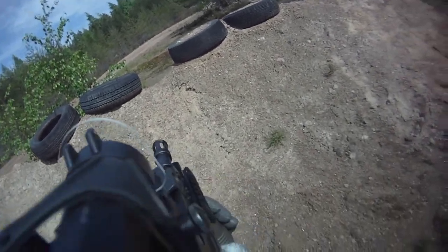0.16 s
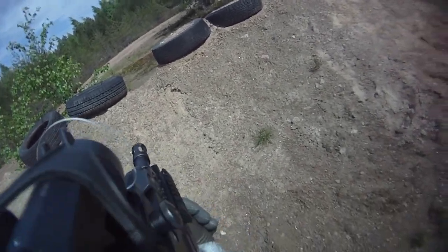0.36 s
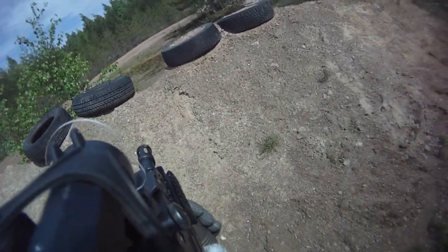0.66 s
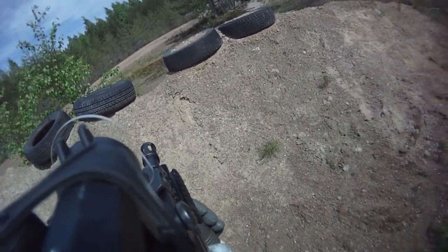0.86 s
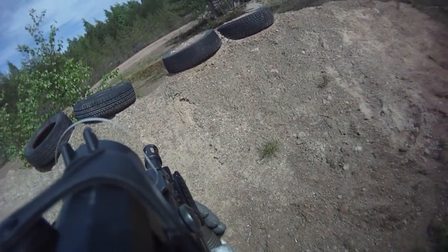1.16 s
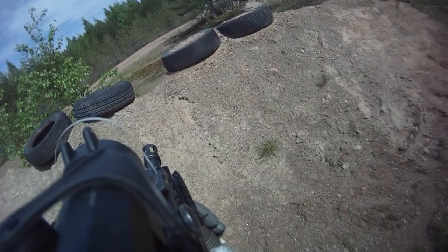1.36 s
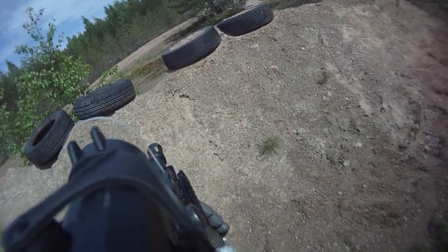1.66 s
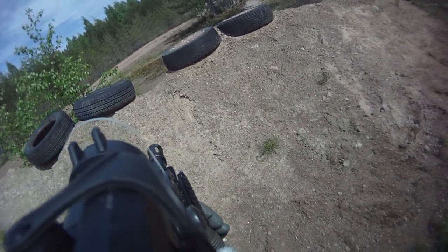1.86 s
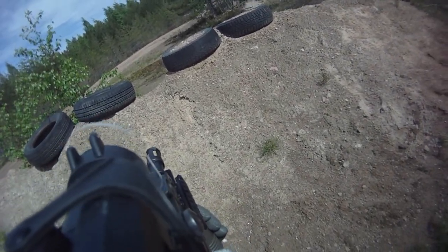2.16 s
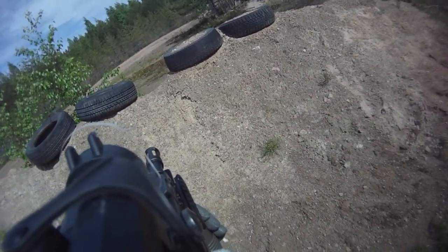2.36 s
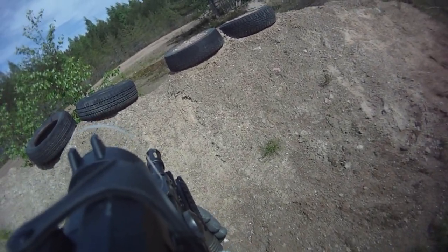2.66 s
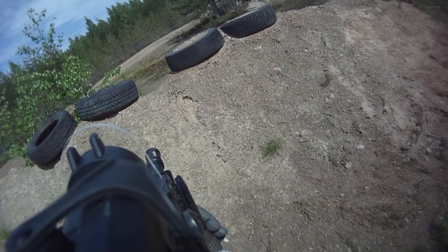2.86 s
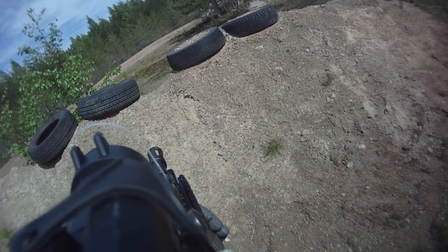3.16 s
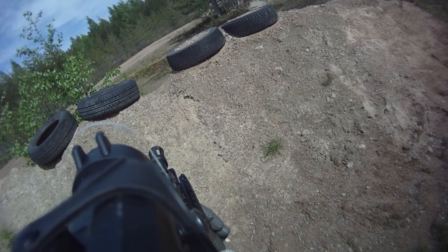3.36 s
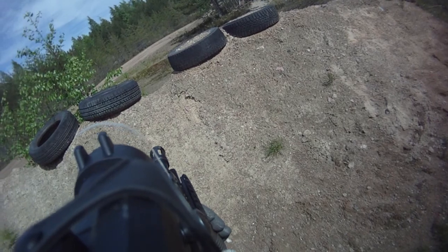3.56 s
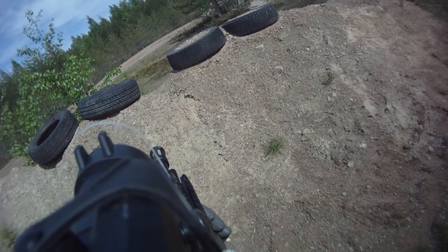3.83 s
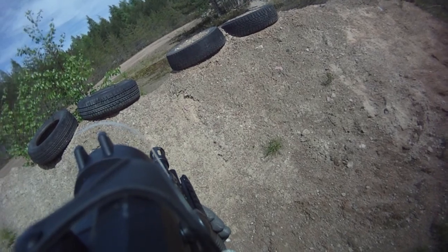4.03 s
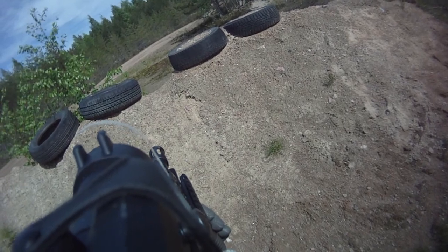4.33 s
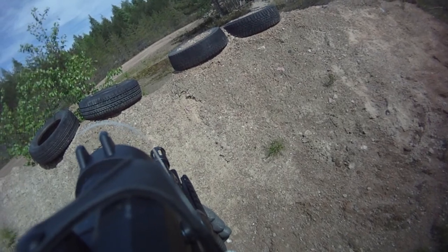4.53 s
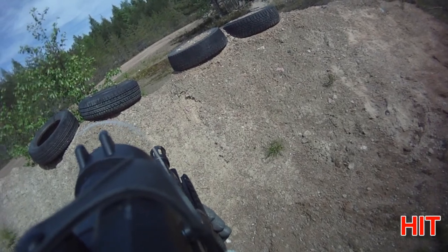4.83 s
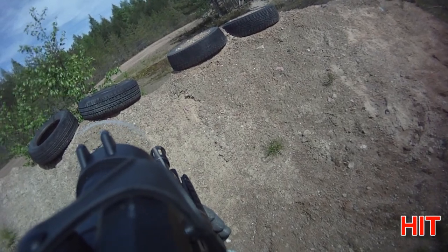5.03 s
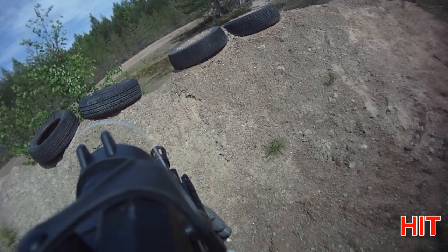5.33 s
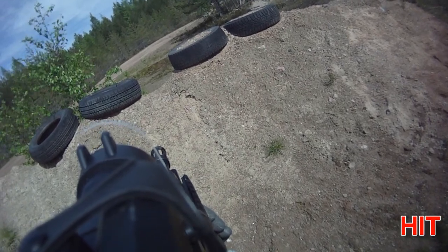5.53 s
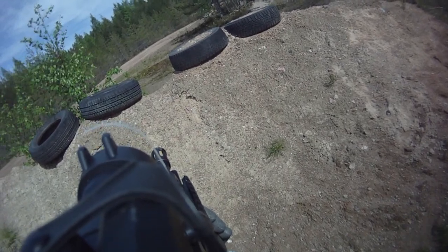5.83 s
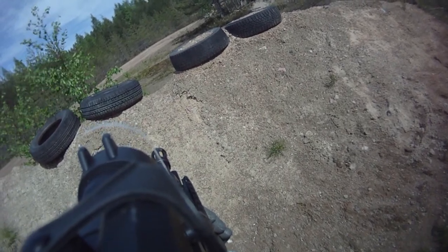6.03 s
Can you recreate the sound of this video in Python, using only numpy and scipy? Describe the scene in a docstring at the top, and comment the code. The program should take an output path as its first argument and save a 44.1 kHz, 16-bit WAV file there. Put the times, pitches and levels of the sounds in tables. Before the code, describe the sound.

Close, dry mechanical clatter of a battery-powered toy rifle: two eleven-shot bursts, then six shots, with quiet rustling wind in trees between.

```python
"""Three automatic bursts of an electric airsoft rifle, close by, out of doors, over a rush of wind in the trees.
Each shot: piston slam (struck shell modes), muzzle pop (swelling barrel modes), nozzle snap (modes and noise).
Around the shots: gears (harmonics of a tooth rate, coloured noise, ticks), trigger clicks and latch clacks.
A small camera's gain control ducks rifle and wind together; loud peaks clip."""
import sys
import numpy as np
from scipy import signal
from scipy.fft import rfft, irfft
from scipy.io import wavfile

SR = 44100
rng = np.random.default_rng(int(sys.argv[2]) if len(sys.argv) > 2 else 0)


def master(y):
    """Save y as 16-bit WAV."""
    cut = np.clip(np.atleast_2d(y).T, -1, 1)
    pcm = np.round(cut * 32767)  # scale
    wavfile.write(sys.argv[1], SR, pcm.astype(np.int16))


N = 272979
TIME = np.arange(N) / SR
AGE = np.arange(4096) / SR  # time since the start of one short sound

# motor start to last shot: (motor start [s], first shot [s], shots [count], cycle at speed [s],
# first wind-up tooth rate [Hz], first wind-up whine level [dB], first wind-up noise offset [dB])
BURSTS = [(1.151, 1.248, 11, .0929, 1310, -9, 2), (2.572, 2.6611, 11, .0934, 1190, -12, -1),
          (4.366, 4.4561, 6, .0934, 1220, -10, 0)]
# stock thud as the spring is let go: (frequency [Hz], relative level [dB])
STOCK_MODES = [(120, -26), (268, -32)]
# hollow receiver as the piston drives home: (frequency [Hz], relative level [dB])
BOOM_MODES = [(296, -0.5), (375, -2)]
# lesser piston blows: (mean time after slam [s], level re slam force [dB], rattle t60 [s])
BLOWS = [(-.0106, -25, .02), (-.003, -23, .02), (-.0014, -19, .012), (.0016, -18, .01), (.0042, -13, .009),
         (.0054, -17, .01), (.0076, -18, .01), (.0148, -28, .02)]
# air in barrel and muzzle, before pitch scaling: (frequency [Hz], relative level [dB])
BARREL_MODES = [(470, -10.5), (560, -1.5), (740, -16.5)]
# nozzle knock, before pitch scaling: (frequency [Hz], relative level [dB])
NOZZLE_MODES = [(430, -39.5), (620, -15), (750, -12.5)]


def firing(burst, slam_db=15, chatter_db=-4, pop_db=6.5, boom_db=-5.0, stock_db=4,
           release_db=2, nozzle_db=4, snap_db=-13, hiss_db=-24):
    """Release, slam, muzzle pop and nozzle return, once for each turn of the sector gear."""
    release_s, pop_s, return_s, lag_s, jitter_s = .0106, .0037, .0225, .0075, .00005
    contact_s, push_s, boom_s, stock_s, pitch_spread = .00005, .0025, .0062, .009, .015
    # slam and pop start weaker and settle; chance varies each shot
    first_slam_db, first_pop_db, settle_shots, shot_spread_db = -3, -3.5, 1.5, 1.77
    pop_swell_s, pop_start_ratio, pop_rise_per_s = .0029, .783, 78
    out = np.zeros(N)
    for k, slam_s in enumerate(shots_of(burst)):
        settling = np.exp(-k / settle_shots)
        force_db = settling * first_slam_db + shot_spread_db * rng.standard_normal()
        air_db = settling * first_pop_db + shot_spread_db * rng.standard_normal()
        force = gain_of(slam_db + force_db)
        pitch = 1 + pitch_spread * rng.standard_normal()

        stock = gain_of(stock_db) * ring(STOCK_MODES, stock_s)
        release = gain_of(release_db) * ring(NOZZLE_MODES, push_s, pitch=.59)
        add(out, slam_s - release_s, stock + release)

        add(out, slam_s, force * strike(contact_s) + gain_of(chatter_db) * rattle(.0053))
        add(out, slam_s - .003, gain_of(boom_db + air_db) * ring(BOOM_MODES, boom_s))
        for delay_s, db, t60 in BLOWS:
            blow_s = slam_s + delay_s + jitter_s * rng.standard_normal()
            add(out, blow_s, force * gain_of(db) * clack(t60))

        pop = ring(BARREL_MODES, pop_swell_s, pop_start_ratio * pitch, pop_rise_per_s)
        hiss = force * gain_of(hiss_db) * puff(push_s)
        add(out, slam_s + pop_s, gain_of(pop_db + air_db) * pop + hiss)

        # later return while the motor gathers speed
        back_s = slam_s + return_s + lag_s * np.exp(-k)
        nozzle = gain_of(nozzle_db) * ring(NOZZLE_MODES, push_s, pitch)
        add(out, back_s, nozzle + gain_of(snap_db) * puff(push_s))
    return out


LAG_S, LAG_SHARE = .0118, .12  # total time lost; each cycle's loss as a share of the one before


def shots_of(burst):
    """Shot times [s]: the motor gathers speed over the first cycles, then the beat is even."""
    first_s, shots, cycle_s = burst[1:4]
    k = np.arange(shots)
    return first_s + k * cycle_s + LAG_S * (1 - LAG_SHARE ** k)


# gearbox and receiver modes: (frequency [Hz], mean relative level [dB], t60 [s])
SHELL_MODES = [(744, -28.5, 0.033), (1276, -27.5, 0.033), (1940, -7.5, 0.008), (2357, -10, 0.006),
               (2720, -18, 0.01), (3590, -16.5, 0.0086), (5000, -22.5, .005), (5200, -25.5, 0.011),
               (6370, -15.5, 0.0054), (7020, -8, 0.0059), (11800, -22.5, 0.0024)]


def strike(contact_s, scatter_db=1.9):
    """A blow on the gearbox: the shorter the contact, the brighter the ring."""
    modes = np.zeros(len(AGE))
    for hz, db, t60 in SHELL_MODES:
        level = gain_of(db + scatter_db * rng.standard_normal())
        modes += level * dying(t60) * np.cos(2 * np.pi * hz * AGE)
    contact = swelling(contact_s)
    return signal.oaconvolve(modes, contact / contact.sum())[:len(AGE)]


# colour of loose parts, puffs and scatter: (frequency [Hz], relative level [dB])
RATTLE_SPECTRUM = [(60, -29), (250, -22.5), (500, 11.5), (750, -4.5), (1000, 5.5), (2100, 11), (3600, 13.5),
                   (5500, 2.5), (7200, -9.5), (9000, -38.5), (12500, -23.5), (15500, -18.5)]


def rattle(t60):
    """Loose parts chatter after a blow: coloured noise, decaying."""
    return coloured(rng.standard_normal(len(AGE)), RATTLE_SPECTRUM) * dying(t60)


def clack(t60, rattle_db=-2):
    """A lesser, duller blow: shell ring plus chatter."""
    return strike(.00008) + gain_of(rattle_db) * rattle(t60)


def puff(swell_s):
    """A short rush of noise through the gun's body."""
    return coloured(rng.standard_normal(len(AGE)), RATTLE_SPECTRUM) * swelling(swell_s)


def ring(modes, swell_s, pitch=1, rise_per_s=0):
    """Well damped modes driven by a soft push; their pitch may climb as they sound."""
    turn = 2 * np.pi * pitch * (AGE + rise_per_s * AGE ** 2 / 2)
    tones = sum(gain_of(db) * np.sin(hz * turn) for hz, db in modes)
    return swelling(swell_s) * tones


RUN_DOWN_S = .1  # gears run on after the last slam


def gears(burst, rise_s=.013, coast_s=.063, wind_up_db=-1):
    """Steel teeth grind, tick and whine as the motor turns them."""
    whine_db, unloaded_db, coasting_db, waver, release_s = -16.5, -1, 1.5, .005, .011
    start_s, first_s, _, _, first_hz, first_db, noise_db = burst
    stop_s = shots_of(burst)[-1] + RUN_DOWN_S
    tooth_hz = mesh_pitch(burst) * (1 + waver * wander(150))
    turn = 2 * np.pi * np.cumsum(tooth_hz) / SR
    fade_in = np.clip((TIME - start_s) / rise_s, 0, 1)
    fade_out = np.clip((stop_s - TIME) / coast_s, 0, 1)
    winding_up = np.interp(TIME, [first_s - release_s, first_s], [1, 0])
    speed = np.minimum(tooth_hz / first_hz, 1)
    grind = grinding() * gain_of((wind_up_db + noise_db) * winding_up) * speed ** .5
    # fast, lightly loaded gears sing least; the slow first stroke has most torque and sings loudest
    unloaded = np.clip((tooth_hz - 2000) / 500, 0, 1)
    first_torque = winding_up * gain_of(first_db) * speed ** 2
    later_torque = (1 - winding_up) * gain_of(whine_db + unloaded_db * unloaded)
    # slack gears ring out as they slow
    coasting = np.interp(TIME, [stop_s - RUN_DOWN_S, stop_s - coast_s], [0, 1])
    sung = (first_torque + later_torque) * gain_of(coasting_db * coasting) * whine(tooth_hz, turn)
    return fade_in * fade_out * (grind + sung + ratchet(turn))


def mesh_pitch(burst):
    """Pinion tooth rate [Hz]: spins up, sags ever faster as each stroke loads the spring, coasts down."""
    free_hz, loaded_hz = 2540, 1930  # scaled down over the first cycles
    spin_up_s, recover_s, release_s, coast_s = .075, .03, .011, .026
    start_s, first_hz, times = burst[0], burst[4], shots_of(burst)
    u = np.linspace(0, 1, 8)
    points = [*zip(start_s + u * spin_up_s, first_hz * (1 - (1 - u) ** 2))]
    points += [(times[0] - release_s, first_hz)]
    for k, (slam_s, next_s) in enumerate(zip(times, times[1:])):
        stroke_s = np.linspace(slam_s + recover_s, next_s - release_s, len(u))
        sag_hz = free_hz + (loaded_hz - free_hz) * u ** 1.5
        points += zip(stroke_s, sag_hz * (1 - .05 * np.exp(-k)))
    points += [(times[-1] + coast_s, 2250), (times[-1] + RUN_DOWN_S, 250)]
    return np.interp(TIME, *np.transpose(sorted(points)))


# gearbox colour under the running gears: (frequency [Hz], relative level per Hz [dB])
GEAR_SPECTRUM = [(110, -28), (290, -10.5), (500, 4), (760, 2.5), (960, -8.5), (1320, -1.5), (1560, -7.5),
                 (2120, -1.5), (2800, -5), (3550, 0.5), (4700, -10), (5500, -11.5), (8600, -18.5),
                 (12500, -25), (15500, -22.5)]
# gearbox resonances: (frequency [Hz], width [Hz], relative level [dB])
SINGING_MODES = [(630, 340, -45), (1310, 130, -41), (2090, 150, -35.5), (3270, 170, -49), (4530, 300, -45)]


def whine(tooth_hz, turn, second_db=-6, third_db=-6):
    """Tooth-rate harmonics flare as they sweep across the gearbox's resonances."""
    flare_db, flutter = 3.5, .2
    at_hz, db = np.transpose(GEAR_SPECTRUM)
    out = np.zeros(N)
    for k, harmonic_db in enumerate([0, second_db, third_db], 1):
        hz = k * tooth_hz
        on_resonance = sum(np.exp(-((hz - centre) / (1.9 * width)) ** 2)
                           for centre, width, _ in SINGING_MODES)
        level_db = harmonic_db + np.interp(hz, at_hz, db) + flare_db * (on_resonance - 2.5)
        out += gain_of(level_db) * np.sin(k * turn)
    return out * (1 + flutter * wander(120))


def grinding(grind_db=-23, tick_db=2.5):
    """Uneven tooth contacts heard through the gearbox and its resonances."""
    teeth = rng.standard_normal(N) * gain_of(tick_db * wander(700))
    rough = coloured(teeth, GEAR_SPECTRUM)
    out = gain_of(grind_db) * rough
    for hz, width_hz, db in SINGING_MODES:
        resonance = signal.lfilter(*signal.iirpeak(hz, hz / width_hz, SR), rough)
        out += gain_of(db) * evened(resonance)
    return out


def ratchet(turn, tick_db=-26, knock_db=-10, spread_db=2, teeth_per_tick=40):
    """The anti-reversal latch rides over the bevel gear, one tick every so many teeth."""
    out = np.zeros(N)
    ticking = np.diff(turn // (2 * np.pi * teeth_per_tick)) > 0
    for s in TIME[1:][ticking]:
        size = gain_of(spread_db * rng.standard_normal())
        tick = gain_of(tick_db) * clack(.004)
        knock = gain_of(knock_db) * ring(NOZZLE_MODES, .0025, rng.uniform(.82, .86))
        add(out, s, size * (tick + knock))
    return out


# each pull: two clicks of slack, the switch, the motor taking up the gears:
# (time before motor start [s], relative level [dB], rattle t60 [s])
PULL_CLICKS = [(.079, -38, .028), (.058, -39, .022), (.018, -33, .026), (0, -30.5, .038)]
# anti-reversal latch catches the gears as they come to rest: (time [s], relative level [dB], rattle t60 [s])
LATCHES = [(2.299, -14.5, 0.047), (3.708, -20.5, 0.048), (5.037, -17, 0.048)]


def trigger(pull_db=-2, latch_db=-1, knock_db=11, sing_db=36):
    """Trigger clicks before each burst and the latch after it, each exciting the gearbox's resonances."""
    out = np.zeros(N)
    knock = gain_of(knock_db) * ring(NOZZLE_MODES, .003, pitch=.72)
    sing = np.zeros(len(AGE))
    for hz, width_hz, db in SINGING_MODES:
        sing += gain_of(sing_db + db) * np.exp(-np.pi * width_hz * AGE) * np.sin(2 * np.pi * hz * AGE)
    for burst in BURSTS:
        for lead_s, db, t60 in PULL_CLICKS:
            add(out, burst[0] - lead_s, gain_of(pull_db + db) * (clack(t60) + sing))
    for s, db, t60 in LATCHES:
        add(out, s, gain_of(latch_db + db) * (clack(t60) + knock + sing))
    return out


def field(x, echo_db=-30, t60=.12):
    """Faint, dull scatter from the ground and the tyres: a decaying noise tail after an 8 ms gap."""
    tail = rattle(t60) * (AGE > .008)
    return x + gain_of(echo_db) * signal.oaconvolve(x, tail / np.linalg.norm(tail))[:N]


# wind in the trees: (frequency [Hz], relative level per Hz [dB])
TREE_SPECTRUM = [(24, -41.5), (40, -34.5), (103, -16.5), (251, -5), (313, -2.5), (541, 4), (728, 2),
                 (980, -7.5), (2010, -9), (2710, -17.5), (4560, -11), (7310, -28), (8910, -40.5),
                 (11100, -31), (15000, -27)]


def trees(mean_db=-47, swell_db=-2.0, flutter_db=1.0):
    """A steady, distant rush of wind in the leaves: coloured noise with slow and quick chance swells."""
    level_db = mean_db + swell_db * wander(1) + flutter_db * wander(25)
    return gain_of(level_db) * coloured(rng.standard_normal(N), TREE_SPECTRUM)


def gain_of(db):
    """Decibels to amplitude."""
    return 10 ** (np.asarray(db) / 20)


def evened(x):
    """Scales to rms 1."""
    return x / np.sqrt(np.mean(x ** 2) + 1e-20)


def add(mix, s, sound):
    """Lays a sound into the mix at time s [s]."""
    part = mix[round(s * SR):][:len(sound)]
    part += sound[:len(part)]


def coloured(x, spectrum):
    """Filters x by a (frequency [Hz], level [dB]) spectrum, at rms 1."""
    hz, db = np.transpose(spectrum)
    bins_hz = np.fft.rfftfreq(len(x), 1 / SR)
    gain = gain_of(np.interp(np.log(bins_hz + 1), np.log(hz + 1), db))
    return evened(irfft(rfft(x) * gain, len(x)))


def wander(hz):
    """Slow chance up to about the given rate, rms 1."""
    bins_hz = np.fft.rfftfreq(N, 1 / SR)
    return evened(irfft(rfft(rng.standard_normal(N)) * np.exp(-(bins_hz / hz) ** 2), N))


def dying(t60):
    """Exponential decay by 60 dB in t60 [s]."""
    return np.exp(-np.log(1000) * AGE / t60)


def swelling(swell_s):
    """A soft hump that peaks at 1 after swell_s and is soon gone."""
    return AGE / swell_s * np.exp((1 - (AGE / swell_s) ** 2) / 2)


def scene():
    """The rifle at arm's length over the quiet field, with the trees behind."""
    rifle = trigger() + sum(firing(burst) + gears(burst) for burst in BURSTS)
    return (field(rifle) + trees())[None]


def ducking_db(x, threshold_db=-1, attack_s=.9, recover_db_per_s=19, hold_s=.2, block=64):
    """Gain control: creeps toward the held peak's excess over threshold, else recovers steadily."""
    peaks = abs(x[:N // block * block]).reshape(-1, block).max(1)
    peak_db = 20 * np.log10(peaks + 1e-9)
    step_s, duck_db, curve_db = block / SR, 0, []
    hold_blocks = round(hold_s / step_s)
    for k in range(len(peak_db)):
        over_db = peak_db[max(k - hold_blocks, 0):k + 1].max() - threshold_db
        if over_db > duck_db / 2:
            duck_db += (over_db - duck_db) * step_s / attack_s
        else:
            duck_db = max(duck_db - recover_db_per_s * step_s, 0)
        curve_db.append(duck_db)
    return np.interp(TIME, np.arange(len(curve_db)) * step_s, curve_db)


def low_pass(x, hz):
    """A steep band limit."""
    return signal.oaconvolve(x, signal.firwin(301, hz, window=("kaiser", 8), fs=SR), "same")


def record(dry, notch_hz=9100, notch_q=3, low_cut_hz=75, edge_hz=15450, top_hz=16200):
    """Microphone low cut, housing notch, band limit, gain control, hard overload, final band limit."""
    low_cut = signal.butter(2, low_cut_hz, "high", fs=SR, output="sos")
    x = signal.sosfilt(low_cut, dry[0])
    x = signal.lfilter(*signal.iirnotch(notch_hz, notch_q, SR), x)
    x = low_pass(x, edge_hz)
    x = np.clip(x * gain_of(-ducking_db(x)), -1, 1)
    return low_pass(x, top_hz)[None]


dry = scene()
out = record(dry)
master(out)
```